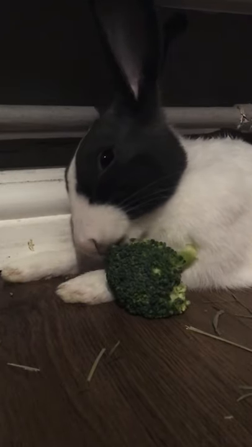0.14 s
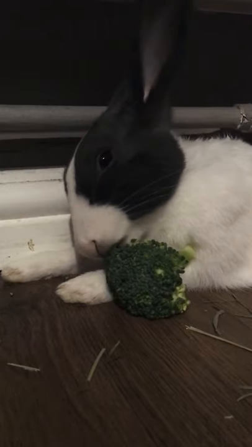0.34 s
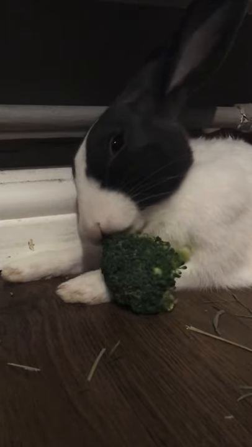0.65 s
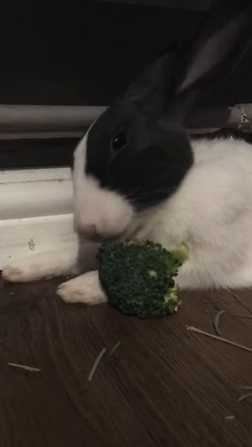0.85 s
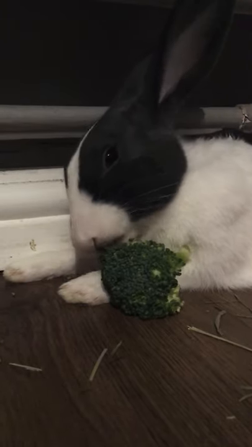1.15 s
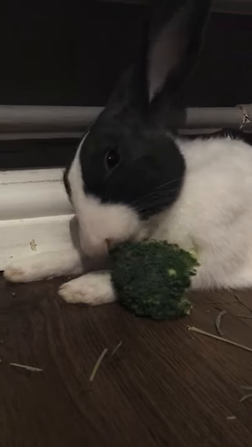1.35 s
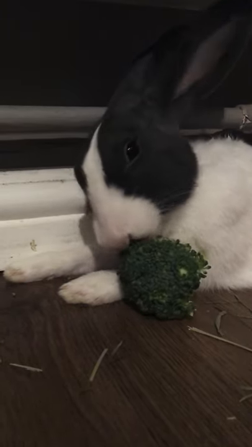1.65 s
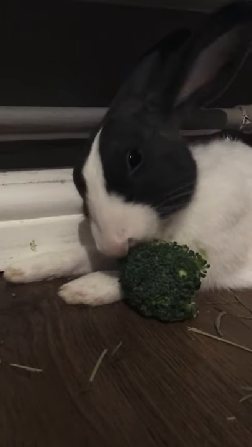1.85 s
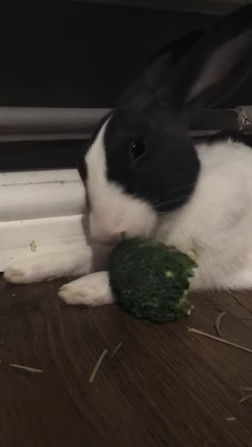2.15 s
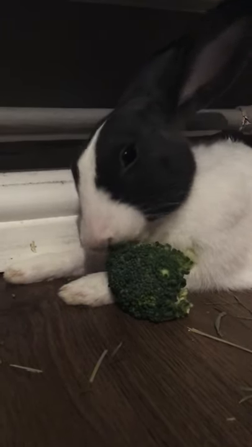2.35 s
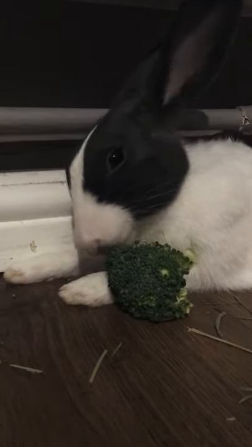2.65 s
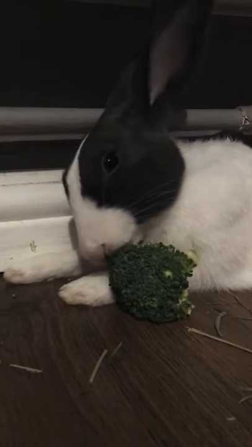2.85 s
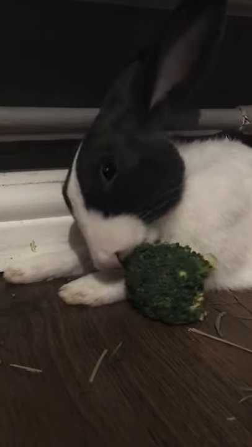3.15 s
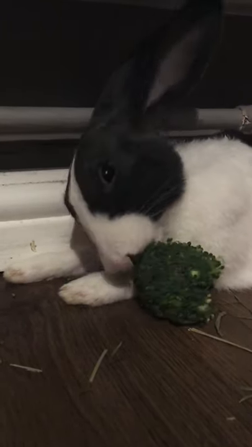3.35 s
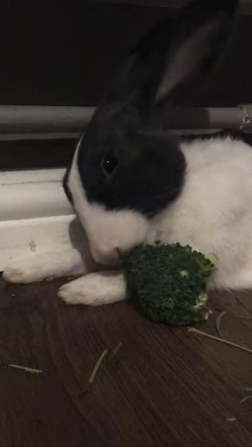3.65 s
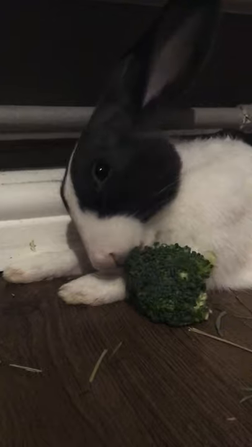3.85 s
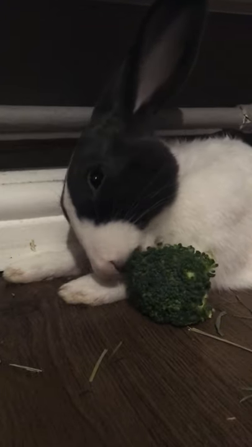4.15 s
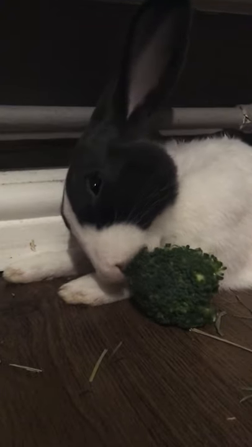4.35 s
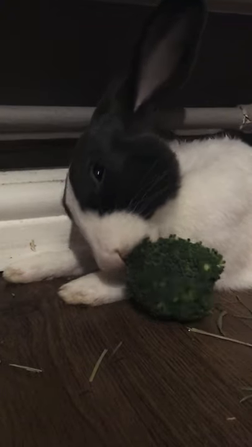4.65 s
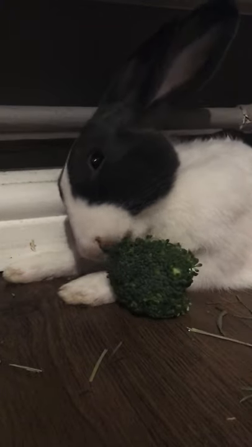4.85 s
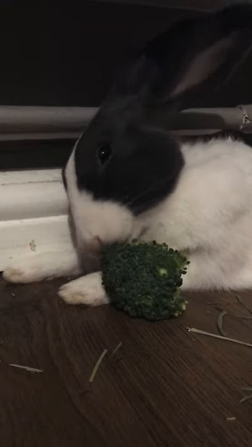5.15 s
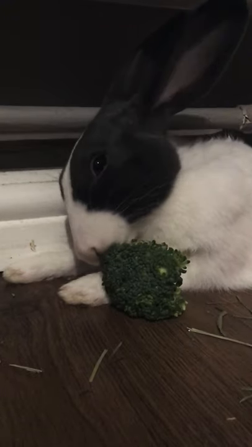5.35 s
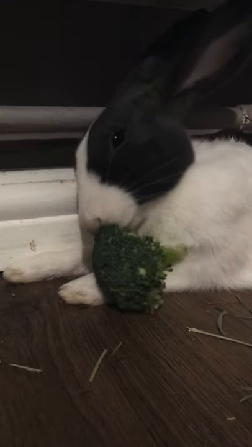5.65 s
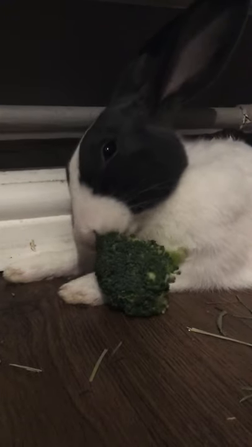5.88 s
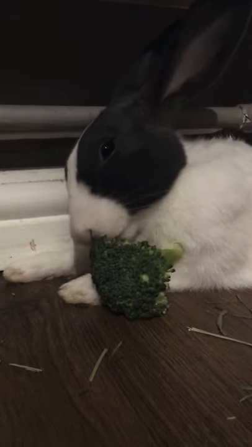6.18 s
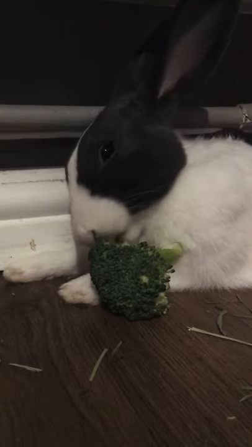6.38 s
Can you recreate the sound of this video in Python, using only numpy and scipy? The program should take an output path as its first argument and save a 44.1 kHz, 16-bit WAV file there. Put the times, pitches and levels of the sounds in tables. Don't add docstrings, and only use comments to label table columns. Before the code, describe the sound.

Indoors and close to the microphone, small dry snaps, faint fizzing nibbles and quiet chewing strokes come from a rabbit biting a broccoli head. Sparse at first, the bites peak sharply near two and five seconds and become busier towards the end. Soft bumps on the floorboards are barely noticeable. Behind them lie a low, slowly descending engine drone, muffled traffic rumble and constant thin hiss.

```python
import sys
import numpy as np
from scipy import signal
from scipy.fft import rfft, irfft
from scipy.io import wavfile
from scipy.ndimage import uniform_filter1d

SR = 44100
rng = np.random.default_rng(int(sys.argv[2]) if len(sys.argv) > 2 else 0)


def convert_level_to_amplitude(level_db):
    exponent = np.asarray(level_db, float) / 20
    return 10 ** exponent


def log_audio(samples):
    frames = np.atleast_2d(samples).T
    limited = np.clip(frames, -1, 1)
    pcm = np.round(limited * 32767).astype(np.int16)
    wavfile.write(sys.argv[1], SR, pcm)


N = 287532
TIME = np.arange(N) / SR


def level(x, db):
    return x * convert_level_to_amplitude(db) / np.sqrt(np.mean(x ** 2))


def coloured(points):
    hz, db = np.transpose(points)
    bins_hz = np.arange(N // 2 + 1) * SR / N + 1
    gain = convert_level_to_amplitude(np.interp(np.log(bins_hz), np.log(hz), db))
    return level(irfft(rfft(rng.standard_normal(N)) * gain, N), 0)


def walk(rate_hz):
    hold = int(SR / rate_hz)
    steps = np.repeat(rng.standard_normal(N // hold + 1), hold)
    return 1.3 * uniform_filter1d(uniform_filter1d(steps, hold), hold)[:N]


def soft_top(x):
    return signal.sosfilt(signal.ellip(8, .3, 50, 15600, fs=SR, output="sos"), x)


def around(hz, octaves, chance):
    return hz * 2 ** (octaves * chance)


def rings(peak_s, peak_db, ring_hz, cycles, rise, size):
    turn = rng.random(len(peak_s))[:, None]
    cycles = np.reshape(cycles, (-1, 1))
    samples = np.arange(size) - size // 4
    t = samples / SR * ring_hz[:, None]
    shape = np.exp(np.where(t < 0, -(t / (rise * cycles)) ** 2, -t / cycles))
    grains = convert_level_to_amplitude(peak_db)[:, None] * shape * np.cos(2 * np.pi * (t + turn))
    at = (peak_s * SR).astype(int)[:, None] + samples
    return np.bincount(np.clip(at, 0, N - 1).ravel(), grains.ravel(), N)


def crackle(middle_s, length_s, level_db, pitch_hz, octaves, cycles, count):
    shift, pitch, size = rng.random((len(middle_s), count, 3)).T
    when = middle_s + .7 * length_s * (shift + shift[::-1] ** 2 - 5 / 6)
    size_db = level_db - 3.27 * np.log(np.clip(size, .05, 1)) + 10 * np.log10(length_s / 0.041)
    crack_hz = around(pitch_hz, octaves, pitch - .5)
    cycles = cycles + 0 * when
    return rings(when.ravel(), size_db.ravel(), crack_hz.ravel(), cycles.ravel(), rise=.7, size=192)


CRUMB_HZ, CRUMB_OCTAVES = 11500, .5

# (start_s, snap_db, ring_hz, knock_db)
STALK_BITES = [(.7084, -47, 10000, -57), (1.1749, -51, 11100, -54), (1.2, -53, 10100, -52),
               (1.9541, -26, 12500, -44), (1.9626, -24, 12700, -43), (1.9694, -27, 12300, -47),
               (1.9765, -35, 11900, -45), (1.9957, -45, 10700, -58), (2.0051, -50, 9700, -54),
               (2.0102, -43, 10700, -49), (3.4069, -33, 13600, -50), (3.4128, -28, 12900, -48),
               (3.4312, -35, 13100, -50), (3.4646, -32, 13200, -43), (3.779, -48, 9800, -53),
               (4.6619, -39, 13800, -52), (4.6899, -40, 12400, -52), (4.7034, -42, 12500, -51),
               (4.7562, -42, 13000, -55), (4.7617, -41, 11600, -53), (5.032, -41, 11500, -56),
               (5.0733, -31, 11300, -42), (5.0782, -33, 12600, -53), (5.3128, -40, 11200, -59),
               (5.3387, -53, 10900, -56), (5.9573, -46, 10800, -55), (5.9631, -45, 12600, -49),
               (5.9681, -46, 10400, -54), (5.9711, -45, 11800, -50), (5.9932, -38, 11300, -52)]


def jaw():
    start_s, _, _, knock_db = np.transpose(STALK_BITES)
    low, high, size = rng.random((len(start_s), 3)).T - .5
    late_s, octaves = .0006, .4
    knock = start_s + late_s, knock_db, around(1430, octaves, low)
    thud = start_s + .0017, knock_db - 9, around(740, octaves, size)
    tick = start_s + late_s / 2, knock_db - 7 + 6 * size, around(5000, .7, high)
    return np.hstack([knock, thud]), np.array(tick)


# (middle_s, length_s, bright_crackle_db, dull_crackle_db, mouth_hz)
CHEW_STROKES = [(0.129, 0.068, -80, -81, 1920), (0.502, 0.12, -80.5, -94, 2430),
                (1.044, 0.023, -72.5, -75, 2550), (1.08, 0.046, -76, -76, 885),
                (1.196, 0.1, -91, -86, 1200), (1.419, 0.058, -79.5, -81.5, 3250),
                (1.568, 0.041, -94, -77.5, 790), (1.66, 0.099, -82.5, -98, 2010),
                (1.964, 0.074, -79, -74, 1660), (2.455, 0.046, -74.5, -79, 1670),
                (2.66, 0.043, -74.5, -74, 1740), (3.078, 0.044, -77.5, -85, 2840),
                (3.436, 0.18, -79.5, -81.5, 1740), (3.801, 0.098, -77, -77.5, 1850),
                (4.373, 0.23, -80, -88, 2450), (4.598, 0.061, -79, -87, 2460),
                (4.693, 0.12, -74.5, -79.5, 1360), (4.806, 0.096, -74.5, -87, 2010),
                (5.078, 0.014, -74, -66.5, 1680), (5.349, 0.045, -75.5, -79, 1710),
                (5.832, 0.099, -80, -93, 2000), (5.963, 0.046, -67, -73, 1760),
                (6.159, 0.07, -71, -88, 1500), (6.367, 0.071, -75, -79, 1280)]
# (start_s,
# peak_db)
BUD_POPS = [(.2688, -49), (.3466, -53), (.9917, -53), (1.6346, -51), (1.677, -53), (3.4671, -45),
            (3.4748, -47), (4.6601, -44), (4.6611, -45), (4.6925, -48), (4.8025, -50), (4.8249, -49),
            (5.0059, -51), (5.0728, -30), (5.0872, -48), (5.1329, -48), (5.3614, -46), (5.543, -49),
            (5.8555, -48), (5.9079, -50), (5.9328, -49), (5.9447, -48), (5.9544, -43), (5.9592, -44),
            (6.0368, -50), (6.1263, -45), (6.1302, -47), (6.1724, -47), (6.242, -52), (6.4139, -49)]


def small_snaps(start_s, peak_db, ring_hz):
    late, size, pitch = rng.random((len(start_s), 2, 3)).T
    around_s = start_s + .0009 * (.5 + late) * [[-1], [1]]
    tears = around_s, peak_db - 14 - 12 * size, ring_hz * (.9 + .2 * pitch)

    middle_s, length_s, bright_db = np.transpose(CHEW_STROKES)[:3]
    shift, size, pitch = rng.random((len(CHEW_STROKES), 6, 3)).T
    crumb_db = bright_db + 13.5 + 7 * size ** 2
    crumbs = middle_s + length_s * (shift - .5), crumb_db, around(CRUMB_HZ, CRUMB_OCTAVES, pitch - .5)

    pop_s, pop_db = np.transpose(BUD_POPS)
    pops = pop_s, pop_db, around(CRUMB_HZ, CRUMB_OCTAVES, rng.random(len(BUD_POPS)) - .5)
    columns = zip((start_s, peak_db, ring_hz), tears, crumbs, pops)
    return [np.concatenate([np.ravel(part) for part in column]) for column in columns]


# (start_s, peak_db, ring_hz)
BUD_SNAPS = [(.1454, -45, 11800), (.268, -46, 10100), (.4501, -50, 13200), (.5274, -47, 12600),
             (.8599, -42, 10300), (1.9076, -49, 11600), (1.9699, -30, 12100), (1.9735, -37, 12300),
             (1.975, -37, 12300), (2.0976, -50, 12100), (2.5564, -45, 12600), (2.7847, -36, 12200),
             (3.7283, -36, 12200), (3.7584, -33, 10700), (3.7612, -41, 10600), (4.2768, -41, 11600),
             (4.3382, -48, 11300), (4.7093, -41, 13100), (4.7931, -41, 11900), (4.822, -48, 9200),
             (5.0686, -43, 12400), (5.0723, -30, 12000), (5.1258, -39, 10300), (5.3589, -41, 12700),
             (5.5344, -46, 12400), (5.7935, -47, 11500), (6.1166, -41, 11200), (6.1484, -44, 12500),
             (6.2949, -41, 10500), (6.3461, -46, 10600)]
# (start_s, peak_db, ring_hz)
FIBRE_TICKS = [
    (2.6665, -58, 5000),
    (4.3134, -58, 3900),
    (4.3148, -56, 3600),
    (4.6336, -52, 5300),
    (6.295, -56, 6400),
]


def snaps(fibres):
    bites_and_buds = np.hstack([np.transpose(STALK_BITES)[:3], np.transpose(BUD_SNAPS)])
    start_s, peak_db, ring_hz = small_snaps(*bites_and_buds)
    hard = peak_db > -42
    soft = ~hard
    ring = rings(start_s[hard], peak_db[hard] + 2.2, ring_hz[hard], cycles=1.15, rise=.9, size=96)
    ring += soft_top(rings(start_s[soft], peak_db[soft] + 1, ring_hz[soft], cycles=1.4, rise=.9, size=96))

    struck = np.bincount((start_s * SR).astype(int), convert_level_to_amplitude(peak_db), N)
    splinter = signal.lfilter([1], [1, -np.exp(-1 / (0.0018 * SR))], struck) * convert_level_to_amplitude(3.5 * walk(2500))
    nearby = signal.lfilter([1], [1, -np.exp(-1 / (0.0068 * SR))], struck)
    air = coloured([(6000, -16), (9000, -6), (12300, 0), (15600, -5), (16000, -32)])
    bright = ring + soft_top(air * (convert_level_to_amplitude(-26) * splinter + convert_level_to_amplitude(-43) * nearby))
    bright = signal.sosfilt(signal.butter(4, 6800, "high", fs=SR, output="sos"), bright)

    start_s, peak_db, ring_hz = np.hstack([fibres, np.transpose(FIBRE_TICKS)])
    return bright + rings(start_s, peak_db + 1.8, ring_hz, cycles=1.4, rise=.8, size=160)


# (start_s, peak_db, ring_hz)
TOOTH_KNOCKS = [(1.0417, -57, 1400), (1.0505, -56, 2000), (1.0539, -57, 920), (1.0621, -58, 760),
                (1.0725, -57, 1040), (1.0771, -56, 940), (1.0803, -54, 850), (1.0837, -54, 860),
                (1.9012, -59, 1150), (2.4581, -58, 1400), (2.4607, -57, 2000), (2.6513, -57, 1670),
                (2.6549, -55, 1770), (2.6627, -57, 1570), (2.667, -47, 1630), (3.4676, -52, 850),
                (3.7973, -53, 2400), (3.8278, -57, 2020), (3.8546, -57, 1780), (4.3143, -57, 1200),
                (4.4295, -56, 1000), (4.433, -58, 2200), (5.0735, -47, 2300), (4.6538, -54, 940),
                (5.0807, -55, 1480), (5.9428, -54, 1620), (5.9759, -57, 1210), (6.3585, -58, 920),
                (6.3672, -58, 1120), (6.3842, -58, 1060)]
# (start_s, peak_db, ring_hz)
FLOOR_BUMPS = [
    (1.081, -52, 330),
    (1.275, -58, 600),
    (1.552, -57, 524),
    (1.575, -47, 334),
    (4.66, -51.5, 305),
    (5.075, -52, 275),
]


def knocks(teeth):
    start_s, peak_db, ring_hz = np.hstack([teeth, np.transpose(TOOTH_KNOCKS)])
    tooth = rings(start_s, peak_db + .8, ring_hz, cycles=.7, rise=.6, size=512)
    start_s, peak_db, ring_hz = np.transpose(FLOOR_BUMPS)
    return tooth + rings(start_s, peak_db, ring_hz, cycles=1.3, rise=0.2, size=4096)


# (middle_s, length_s, level_db, pitch_hz)
WET_SQUEAKS = [
    (0.87, 0.012, -66.5, 7780),
    (1.053, 0.025, -81, 5700),
    (1.089, 0.039, -79, 2800),
    (2.213, .04, -86, 3700),
    (2.289, 0.036, -82.5, 2700),
    (2.651, 0.028, -83, 5550),
    (5.349, 0.026, -80.5, 5800),
    (5.958, 0.047, -81, 5900),
    (6.189, .06, -77, 1520),
]


def chews():
    middle_s, length_s, bright_db, dull_db, mouth_hz = np.transpose(CHEW_STROKES)
    bright = crackle(middle_s, length_s, bright_db, 10800, octaves=0.66, cycles=0.81, count=120)
    strokes = [middle_s, length_s, dull_db, mouth_hz]
    middle_s, length_s, dull_db, mouth_hz = np.hstack([strokes, np.transpose(WET_SQUEAKS)])
    octaves = np.minimum(1.9, (2800 / mouth_hz) ** 2 + .2)
    dull = crackle(middle_s, length_s, dull_db, mouth_hz, octaves, cycles=1 + mouth_hz / 1800, count=75)
    return soft_top(convert_level_to_amplitude(10.0) * bright) + convert_level_to_amplitude(3.0) * dull


def nibbling():
    when, pitch, size = rng.random((900, 3)).T
    at = (when * (N - 1)).astype(int)
    peak_db = -65.5 - 3 * np.log(np.clip(size, .03, 1)) + 4 * walk(9.23)[at]
    ring_hz = around(CRUMB_HZ, .8, pitch - .5)
    return soft_top(rings(at / SR, peak_db, ring_hz, cycles=1.1, rise=0.95, size=96))


# (time_s, firing_hz)
ENGINE_PITCH = [
    (0, 102.3),
    (1, 100.7),
    (2, 97.6),
    (3.4, 95.37),
    (4.6, 91.53),
    (5.5, 91.34),
    (6.52, 88.3),
]
# (time_s, level_db)
ENGINE_LEVEL = [(0, -57), (.3, -52.5), (1.4, -53), (1.9, -60), (2.4, -60), (2.9, -70.5), (3.3, -58),
                (3.75, -52.5), (4.1, -49.5), (4.3, -44), (4.5, -42), (5.1, -44), (5.5, -42.5), (5.9, -44),
                (6.2, -41), (6.52, -44)]


def engine():
    time_s, level_db = np.transpose(ENGINE_LEVEL)
    octave_db = -67 + 0.12 * (level_db + 55)
    firing_hz = np.interp(TIME, *np.transpose(ENGINE_PITCH)) * (1 + 0.0023 * walk(9))
    phase = 2 * np.pi * np.cumsum(firing_hz) / SR
    drone = convert_level_to_amplitude(np.interp(TIME, time_s, level_db) + 0.28 * walk(14)) * np.sin(phase)
    octave_fading_db = 1.5 * walk(3) + 2.0 * walk(6)
    octave = convert_level_to_amplitude(np.interp(TIME, time_s, octave_db) + octave_fading_db) * np.sin(2 * phase)
    half = convert_level_to_amplitude(-66 + 1 * walk(3.3)) * np.sin(phase / 2)
    return np.sqrt(2) * (drone + octave + half)


def band(x, hz, width_hz):
    b, a = signal.iirpeak(hz, hz / width_hz, SR)
    return signal.lfilter(b, a, signal.lfilter(b, a, x))


# (pitch_hz, width_hz, level_db)
ROOM_BOOMS = [
    (48.1, 12, -69.5),
    (76, 48, -63),
    (133, 11, -65.5),
    (159, 41.7, -60.5),
    (192.9, 29.3, -71.5),
    (220.2, 14, -70),
]
# (time_s, level_db)
TRAFFIC_LEVEL = [
    (0.0, -61.5),
    (1.03, -56),
    (2.03, -62.5),
    (3.32, -57.5),
    (3.61, -61),
    (6.52, -59.5),
]
# (pitch_hz, level_db per Hz)
WASH_COLOUR = [(20, -44), (40, -1.5), (240, 1.5), (310, -2.5), (410, -2), (480, -8), (620, -4), (800, -14),
               (1500, -19.5), (3000, -60)]
# (pitch_hz, level_db per Hz)
HISS_COLOUR = [(200, 7.5), (1000, -0.5), (3400, -3), (4800, -7.5), (5600, -4), (7800, -6), (9800, -2.5),
               (10400, -9), (11000, -1), (14500, -1.5), (15750, -6), (15850, -40)]


def room():
    time_s, traffic_db = np.transpose(TRAFFIC_LEVEL)
    boom = np.zeros(N)
    for pitch_hz, width_hz, level_db in ROOM_BOOMS:
        tone = level(band(rng.standard_normal(N), pitch_hz, width_hz), level_db)
        boom += tone * convert_level_to_amplitude(1.33 * walk(2.55))
    boom *= convert_level_to_amplitude(np.interp(TIME, time_s, traffic_db) - np.mean(traffic_db))
    wash_db = -73.5 + 1.12 * (traffic_db + 60.5)
    wash = coloured(WASH_COLOUR) * convert_level_to_amplitude(np.interp(TIME, time_s, wash_db) + 3 + .9 * walk(12))
    hiss = coloured(HISS_COLOUR) * convert_level_to_amplitude(-69.5 + .6 * walk(7))
    return boom + wash + hiss


def scene():
    teeth, fibres = jaw()
    eating = snaps(fibres) + knocks(teeth) + chews() + nibbling()
    return (eating + engine() + room())[None]


def roll_off(x):
    return signal.sosfilt(signal.butter(12, 16670, fs=SR, output="sos"), x)


def record(dry):
    mix = signal.sosfilt(signal.butter(2, 30, "high", fs=SR, output="sos"), dry)
    mix = signal.sosfilt(signal.ellip(8, .2, 60, 16300, fs=SR, output="sos"), mix)
    return roll_off(mix)


dry = scene()
out = record(dry)
log_audio(out)
```